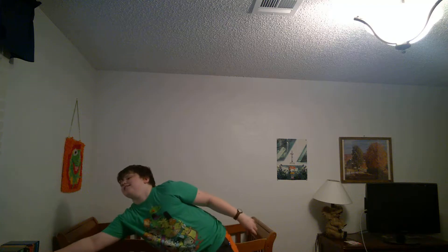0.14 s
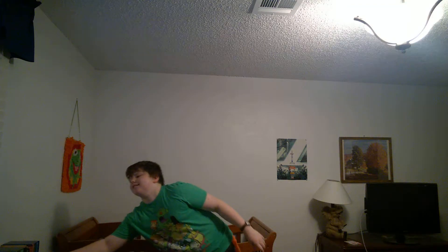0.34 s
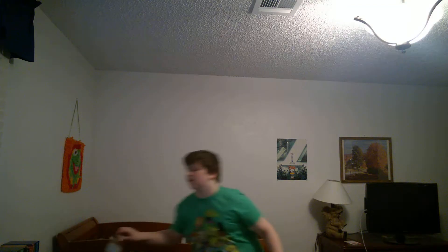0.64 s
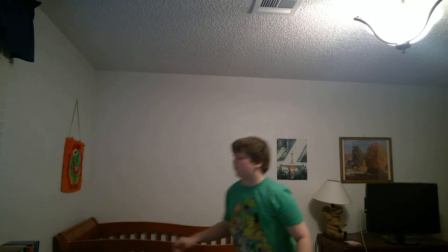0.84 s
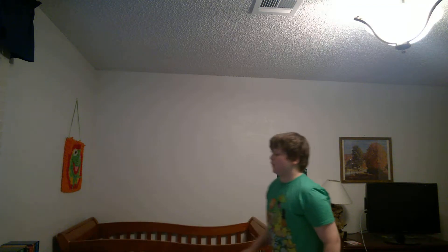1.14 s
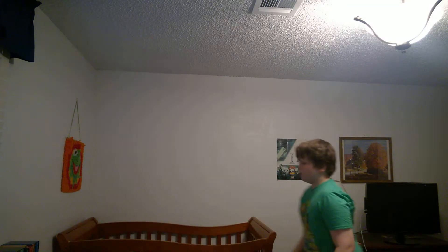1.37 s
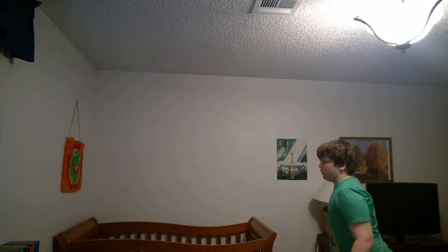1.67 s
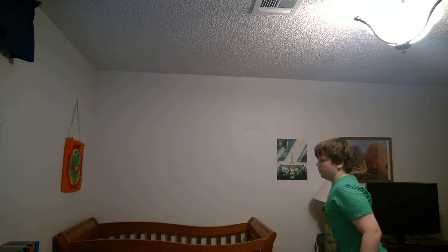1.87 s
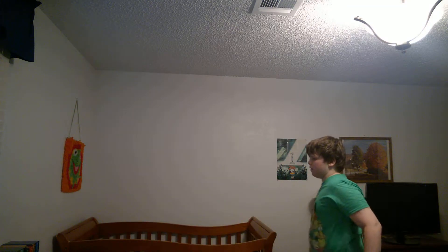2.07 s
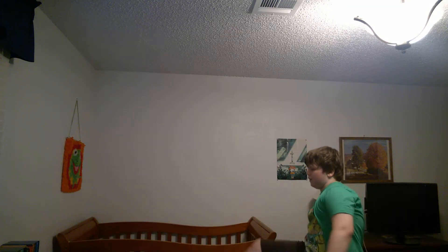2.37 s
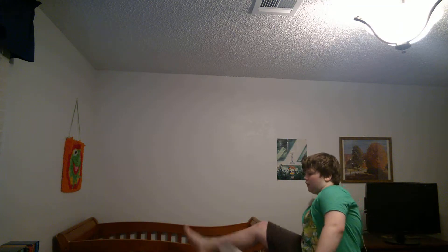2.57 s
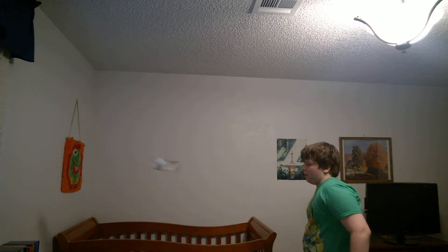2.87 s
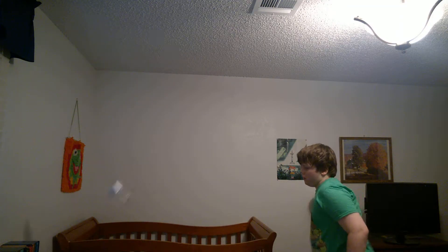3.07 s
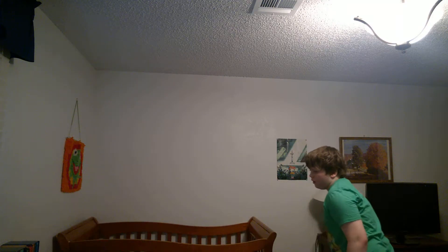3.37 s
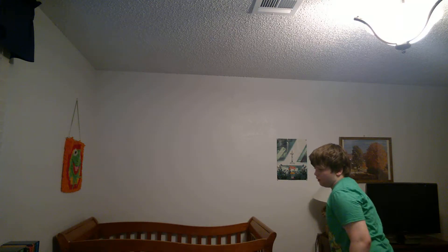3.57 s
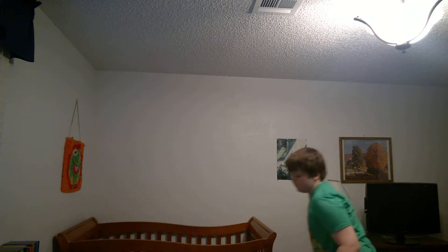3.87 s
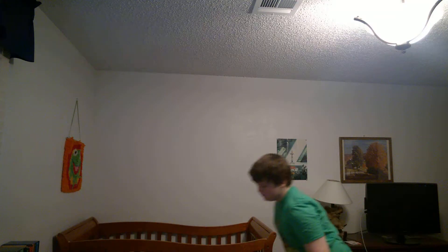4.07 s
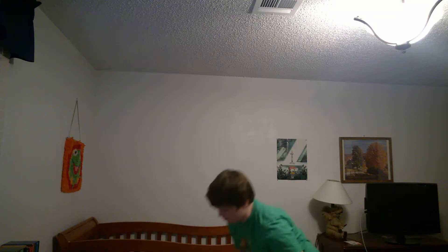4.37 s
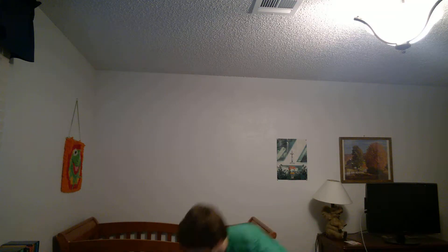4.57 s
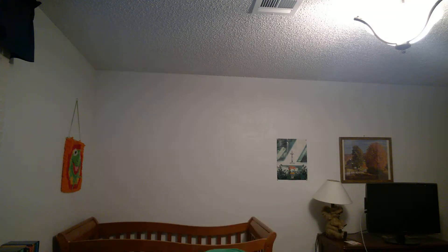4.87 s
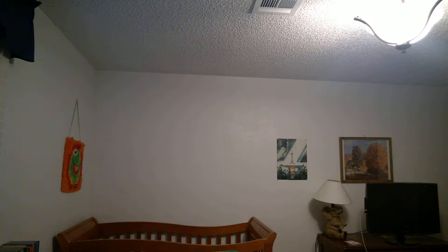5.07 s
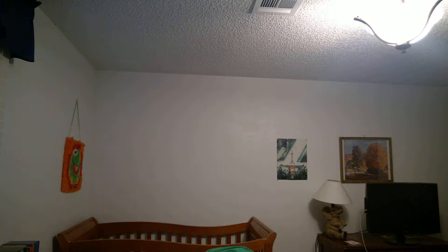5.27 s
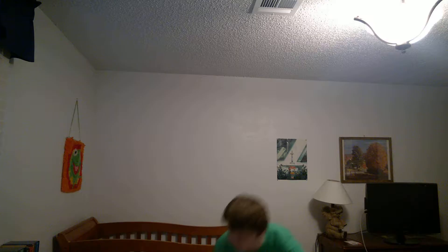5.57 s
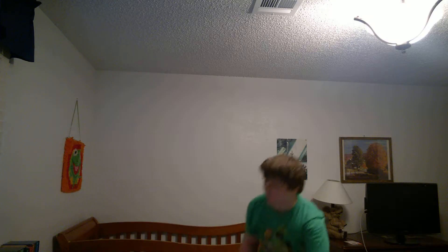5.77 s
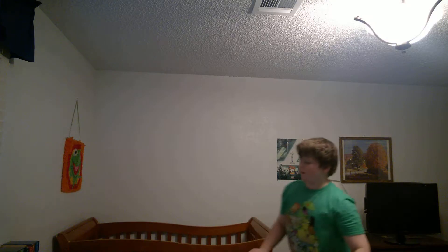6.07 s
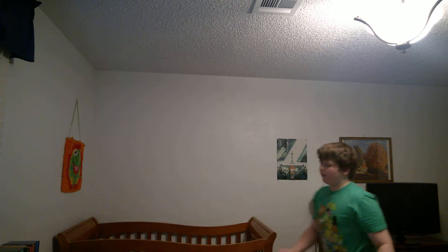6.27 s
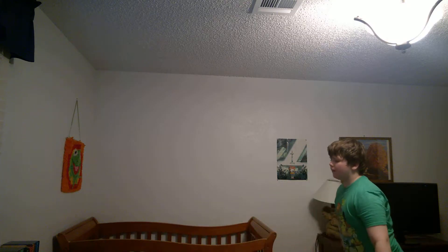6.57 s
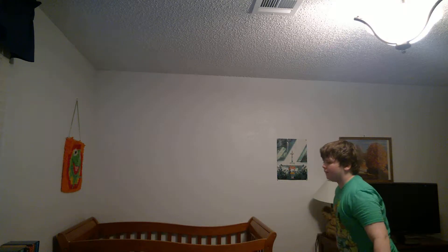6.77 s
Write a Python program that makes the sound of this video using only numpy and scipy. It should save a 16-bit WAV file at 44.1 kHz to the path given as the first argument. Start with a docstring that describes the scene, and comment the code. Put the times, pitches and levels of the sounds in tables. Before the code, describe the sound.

Quiet hollow bottle taps and lapping water come first, followed by low barefoot thuds and cloth swishes over faint rumble and hiss. A light kick sends the bottle into a loud crackling impact, then a second, louder, ringing slam and smaller bounce. A short stick-slip skid, scuffs, more plastic knocks and sloshing follow, ending with a deep step. Stereo microphones sit in a small reflective room.

```python
"""Small bedroom with a hard floor, heard by two closely spaced microphones mostly by way of the walls.
A partly filled plastic bottle is handled and kicked across; it crashes, drops and bounces: each blow
is a hollow knock, a crackle of grains and a set of decaying modes. Lapping water, cloth, scuffs and a
skid are shaped noise or pulses; bare feet on the boards are low decaying swings with soft pushes.
Thin bands squeak and whirr as they glide, short chirps hold one pitch each, over a rumble and hiss."""
import sys
import numpy as np
from scipy import signal
from scipy.fft import rfft, irfft, next_fast_len
from scipy.io import wavfile

SR = 44100
rng = np.random.default_rng(int(sys.argv[2]) if len(sys.argv) > 2 else 0)


def materialize(psi):
    """Save the field psi as 16-bit PCM at rate SR to the path in sys.argv[1].

    A 1-D psi becomes a single channel; in a 2-D psi each row is a channel.
    """
    bounded = np.clip(np.atleast_2d(psi).T, -1, 1)
    quanta = np.round(bounded * 32767).astype(np.int16)
    wavfile.write(sys.argv[1], SR, quanta)


N = 306086
TIME = np.arange(N) / SR
CUTOFF_HZ = 16100  # upper limit of the crackle edges and of the final output


def from_db(db):
    """Decibels to amplitude gain."""
    return 10 ** (np.asarray(db) / 20)


def unit_energy(x):
    """Scale so that the squares sum to one."""
    return x / np.sqrt(np.sum(x ** 2) + 1e-20)


def unit_rms(x):
    """Scale to rms one."""
    return x / np.sqrt(np.mean(x ** 2) + 1e-20)


def at_hz(points, hz):
    """Read a table of (f/Hz, value) on a log-frequency axis."""
    f, value = np.transpose(points)
    return np.interp(np.log(np.maximum(hz, 1)), np.log(f), value)


def add(track, s, sound):
    """Mix a sound into a track at time s."""
    start = max(round(s * SR), 0)
    track[start:start + len(sound)] += sound[:N - start]


def panned(db):
    """Left and right gains for a left-minus-right level difference."""
    return from_db(db / 2 * np.array([[1], [-1]]))


def filtered(x, order, hz, kind="low"):
    """Causal Butterworth filter, low-pass unless told otherwise."""
    return signal.sosfilt(signal.butter(order, hz, kind, fs=SR, output="sos"), x)


def colour(x, spectrum, size=8192):
    """Causal (minimum-phase) filter of unit energy with the given spectrum."""
    log_gain = np.log(from_db(at_hz(spectrum, np.fft.rfftfreq(size, 1 / SR))))
    cepstrum = irfft(log_gain)
    # folding the cepstrum forward in time makes the phase minimal
    cepstrum[1:size // 2] *= 2
    cepstrum[size // 2 + 1:] = 0
    impulse = irfft(np.exp(rfft(cepstrum)))
    return signal.fftconvolve(x, unit_energy(impulse))[:len(x)]


def grains(count, spread_db):
    """Dense tiny clicks of uneven size, rms one."""
    sizes = from_db(spread_db * rng.standard_normal(count))
    return unit_rms(rng.standard_normal(count) * sizes)


def stroke(swell, fade):
    """Pressure that builds over swell s and lets go with time constant fade s, in a half-second window."""
    t = TIME[:SR // 2]
    return np.minimum(t / swell, 1) * np.exp(-np.maximum(t - swell, 0) / fade)


def surge(s, level_db, fall, rise_share):
    """A movement swells to its crest at time s and dies away; the rise scales with the fall."""
    t = TIME - s
    rising = (t / (rise_share * fall)) ** 2
    return from_db(level_db) * np.exp(-np.minimum(np.where(t < 0, rising, t / fall), 20))


def linger(power, seconds):
    """Power leaks away with the given time constant."""
    keep = np.exp(-1 / (seconds * SR))
    return signal.lfilter([1 - keep], [1, -keep], power + 1e-18)


def moving_resonance(drive, hz, width_hz):
    """Random drive ringing in a band whose centre follows the curve hz, near rms one."""
    swell = filtered(drive, 2, width_hz / 2)
    return np.sqrt(2) * unit_rms(swell) * np.sin(2 * np.pi * np.cumsum(hz) / SR)


def glide(rows, width_hz):
    """A thin, unsteady band that follows rows of (t/s, f/Hz, level/dB)."""
    s, hz, level_db = np.transpose(rows)
    level = from_db(np.interp(TIME, s, level_db, left=-120, right=-120))
    return level * moving_resonance(rng.standard_normal(N), np.interp(TIME, s, hz), width_hz)


# How alike diffuse sound is at the two microphones: f/Hz, left-right correlation
MICROPHONE_LIKENESS = [(60, 0.94), (130, 0.68), (290, .82), (640, 0.61), (1400, -0.065), (3100, 0.18),
                       (7000, -0.12), (15000, 0.93)]


def stereo_bands():
    """Yield (low Hz, high Hz, partly correlated stereo noise near rms one) for each third of an octave."""
    edges, count = np.geomspace(18, 18000, 31), next_fast_len(N)
    hz = np.fft.rfftfreq(count, 1 / SR)
    white = rfft(rng.standard_normal((2, count)).astype(np.float32))
    for low, high in zip(edges, edges[1:]):
        in_band = (hz >= low) & (hz < high)
        mid, side = map(unit_rms, irfft(white * in_band, count)[:, :N])
        alike = at_hz(MICROPHONE_LIKENESS, np.sqrt(low * high))
        shared = np.sqrt((1 + alike) / 2) * mid
        opposed = np.sqrt((1 - alike) / 2) * side * [[1], [-1]]
        yield low, high, shared + opposed


# Shape of the steady background, its overall level set apart: f/Hz, relative density/dB per Hz
HUSH_SPECTRUM = [(20, -4.5), (60, -8), (100, -9.5), (157, -22.5), (260, -17.5), (370, -28.5), (460, -22),
                 (620, -30.5), (1000, -37.5), (1700, -36.5), (2500, -43.5), (6000, -44.5), (10000, -51.5),
                 (15500, -59)]


def hush(rms_db=-52):
    """Steady rumble of the house and a faint hiss, as summed noise bands."""
    total = 0
    for low, high, noise in stereo_bands():
        density = from_db(at_hz(HUSH_SPECTRUM, np.sqrt(low * high)))
        total = total + density * np.sqrt(high - low) * noise
    return from_db(rms_db) * unit_rms(total)


# Late die-away of the bedroom: f/Hz, t60/s
ROOM_T60 = [(60, 1.1), (250, 0.28), (1000, 0.5162), (4000, 0.52), (8000, 0.41), (16000, 0.38)]
# Lean of the diffuse field: f/Hz, left minus right/dB
ROOM_BALANCE = [(100, 1), (600, 1.5), (1200, 4), (2400, 4), (4400, -2.5), (8000, -3), (15000, -6)]


def echoes(x, early_share=0.8, early_t60=0.23, build_s=0.00054, shadow_hz=3500):
    """The diffuse field: in each band the sound's power builds up between the walls and dies away."""
    out = 0
    for low, high, noise in stereo_bands():
        hz = np.sqrt(low * high)
        power = filtered(x, 2, [low, high], "band") ** 2
        # furniture shades the treble, which arrives later by way of the ceiling
        power = linger(power, build_s * (1 + hz / shadow_hz))
        # power falls 60 dB, a factor of a million, in one t60
        early = linger(power, early_t60 / np.log(10 ** 6))
        late = linger(power, at_hz(ROOM_T60, hz) / np.log(10 ** 6))
        envelope = np.sqrt(early_share * early + (1 - early_share) * late)
        out = out + panned(at_hz(ROOM_BALANCE, hz)) * noise * envelope
    return out


# How plainly the sources face the microphones: t/s, direct path level/dB
FACING = [(0, -8), (.5, -14), (.7, -2.5), (2.5, -10.5), (2.63, -1), (2.9, -4.5), (3.3, -11), (3.92, -9.5),
          (4.2, -10), (4.4, -27), (5.02, -11), (5.4, -25), (6.5, -13)]
# First reflections off floor, wall and ceiling: delay/s, level against the facing curve/dB
REFLECTIONS = [(.0046, -4.5), (.0118, -7.5), (0.0203, -5.5)]


def bedroom(x, gap_samples=4):
    """A weak direct path, a few first reflections and the diffuse field."""
    direct = x * from_db(np.interp(TIME, *np.transpose(FACING)))
    out = echoes(x)
    paths = [(0.00026, 0.019)] + REFLECTIONS  # the direct path comes first
    for k, (delay, level_db) in enumerate(paths):
        # paths arrive from alternate sides, a few samples apart at the two microphones
        arrival = from_db(level_db) * direct
        add(out[k % 2], delay, arrival)
        add(out[1 - k % 2], delay + gap_samples / SR, arrival)
    return out


# Each jolt sets the water lapping: crest t/s, relative level/dB, dying-away/s, air-pocket note f/Hz
SLOSHES = [(0.069, -52.5, 0.039, 850), (0.117, -47, 0.015, 771), (0.262, -47.5, 0.056, 1000),
           (0.48, -49.5, 0.18, 775), (0.639, -47, 0.018, 981), (1.291, -66, 0.14, 1400),
           (1.635, -47, 0.042, 1310), (1.745, -61, 0.061, 830), (1.99, -66, .04, 591.6),
           (2.12, -52, .025, 522), (2.202, -49.5, 0.034, 1500), (2.57, -63, .03, 1407),
           (2.925, -45.5, 0.031, 1500), (3.095, -46.5, 0.041, 450), (4.975, -49, 0.057, 1188),
           (5.1, -49.5, 0.048, 750), (5.255, -45, .04, 732), (5.35, -54, .04, 1500),
           (5.419, -46.5, .025, 740), (6.295, -46.5, 0.077, 1063), (6.42, -51.5, 0.071, 925),
           (6.505, -55, 0.026, 990)]
# Each move of an arm or leg brushes cloth: crest t/s, relative level/dB, dying-away/s
SWISHES = [(0.113, -57.5, .03), (0.575, -55.5, .05), (1.127, -63.5, .08), (1.4, -58, .05),
           (1.6, -55, 0.078), (2.185, -59, .015), (2.77, -62.5, .05), (2.905, -53.5, .04),
           (4.847, -66, .025), (5.298, -58.5, .1), (6.42, -58.5, .05)]
# Colour of the water: f/Hz, relative density/dB per Hz
SLOSH_SPECTRUM = [(150, -21), (400, 0), (750, -12.5), (1500, -0.5), (2100, -5), (2900, -21), (6000, -23),
                  (16000, -60.5)]
# Colour of the cloth: f/Hz, relative density/dB per Hz
CLOTH_SPECTRUM = [(500, -6), (2500, 4), (4000, 3.5), (5500, 3.5), (7500, -0.5), (10000, 0.5), (16000, -7)]
# rise time constants as a share of the dying-away time
SLOSH_RISE_SHARE, SWISH_RISE_SHARE = 0.88, 0.91


def handling(slosh_db=-3.5, note_db=-3, note_width_hz=450, cloth_db=-1, lump_db=3, lumps_per_s=140):
    """Water laps in small lumps, ringing the bottle's shifting air pocket, while sleeves brush and hiss."""
    slosh = sum(surge(s, level_db, fall, SLOSH_RISE_SHARE) for s, level_db, fall, _ in SLOSHES)
    cloth = sum(surge(s, level_db, fall, SWISH_RISE_SHARE) for s, level_db, fall in SWISHES)
    s, _, _, note_hz = np.transpose(SLOSHES)
    wander = np.interp(TIME * lumps_per_s, np.arange(N), rng.standard_normal(N))
    lumps = unit_rms(from_db(lump_db * wander))
    water = colour(grains(N, spread_db=5.5) * lumps * slosh, SLOSH_SPECTRUM)
    pocket_drive = grains(N, spread_db=6.5) * lumps
    pocket = slosh * moving_resonance(pocket_drive, np.interp(TIME, s, note_hz), note_width_hz)
    sleeves = colour(grains(N, spread_db=3) * lumps * cloth, CLOTH_SPECTRUM)
    return from_db(slosh_db) * water + from_db(note_db) * pocket + from_db(cloth_db) * sleeves


# Thin chirps of skin catching on a smooth surface: crest t/s, f/Hz, level/dB, dying-away/s
CHIRPS = [(0.847, 10100, -47.5, .012), (1.43, 8900, -51.5, 0.0086), (2.359, 3300, -59, 0.012),
          (2.658, 3950, -56, 0.069), (5.505, 9250, -66, 0.021)]


def chirps(width_hz=230):
    """Skin catches on a smooth surface: each chirp is a narrow, unsteady band at one pitch that flares and dies."""
    s, hz, _, _ = np.transpose(CHIRPS)
    nearest = np.searchsorted((s[1:] + s[:-1]) / 2, TIME)
    level = sum(surge(s, level_db, fall, SWISH_RISE_SHARE) for s, _, level_db, fall in CHIRPS)
    return level * moving_resonance(rng.standard_normal(N), hz[nearest], width_hz)


# A hand squeaks faintly on the plastic: t/s, f/Hz, level/dB
SQUEAK = [(.27, 5050, -76), (.32, 5080, -70), (.45, 4960, -69), (.62, 5300, -70)]


def squeak():
    """A hand rubs the plastic: a narrow band of noise glides in pitch and level."""
    return glide(SQUEAK, width_hz=240)


# The flying bottle whirrs: t/s, f/Hz, relative level/dB
WHIRR = [(2.86, 1900, -56), (2.895, 1350, -49.5), (2.925, 1451, -43.5), (2.955, 1640, -50),
         (2.99, 1553, -73)]


def whirr(trim_db=-2):
    """The bottle in flight: a wider gliding band of noise swells and falls."""
    return from_db(trim_db) * glide(WHIRR, width_hz=460)


# Weight landing on the boards: t/s, relative level/dB, floor note f/Hz, rise/s, t60/s
THUMPS = [(0.664, -19.5, 46.5, 0.021, 0.27), (.715, -23.5, 29.8, 0.0066, 0.22),
          (1.366, -12.5, 32.45, 0.018, 0.25), (1.433, -31, 64, 0.0063, 0.22),
          (1.539, -27, 43.6, 0.0124, 0.19), (3.063, -33.5, 48.7, 0.011, 0.34),
          (3.195, -21, 62.4, 0.058, 0.52), (3.298, -11, 66.2, 0.0042, 0.24), (3.93, -8, 48.7, 0.0072, 0.35),
          (3.924, -12.5, 91.7, 0.0027, 0.28), (4.186, -30.5, 185.9, 0.0045, 0.16),
          (4.648, -11.5, 59.9, 0.0224, 0.27), (4.655, -11.5, 31.8, 0.013, 0.18),
          (4.771, -21, 49.5, .012, 0.2), (6.196, -5.5, 43.2, 0.018, 0.22),
          (6.27, -25.5, 54.24, 0.0089, 0.57)]


def boards(overtone=2.1, overtone_db=-24):
    """The floor swings on its joists under each load, with a weaker second mode."""
    out, t = np.zeros(N), TIME[:SR]
    for s, level_db, hz, rise, t60 in THUMPS:
        swing = np.sin(2 * np.pi * hz * t)
        swing = swing + from_db(overtone_db) * np.sin(2 * np.pi * overtone * hz * t)
        add(out, s, from_db(level_db - 60 * t / t60) * (1 - np.exp(-t / rise)) * swing)
    return out


def heels(heel_db=-9, heel_hz=210):
    """Every load on the boards also lands with a soft, dull push: a band-passed impulse."""
    pushes = np.zeros(N)
    impulse = TIME[:SR // 2] == 0
    push = unit_energy(filtered(impulse, 2, [heel_hz / 2, heel_hz * 2], "band"))
    for s, level_db, _, rise, _ in THUMPS:
        add(pushes, s + rise / 2, from_db(level_db + heel_db) * push)
    return pushes


# Soles brushing the floor: t/s, swell/s, fade/s, energy level/dB, treble against the dull part/dB
SCUFFS = [(.658, 0.0095, 0.03, -5, -19), (.839, 0.0079, 0.003, -13.5, 2.5), (1.424, 0.0023, 0.003, -28, 20),
          (2.174, 0.0038, 0.0046, -29.5, 12), (2.35, 0.0066, 0.0082, -31, -2),
          (3.044, 0.0052, 0.0044, -24, 8.5), (3.062, 0.0066, 0.01, -19, -30),
          (4.338, 0.0023, 0.016, -8.5, -3), (4.344, 0.031, 0.024, 1.5, -6.5),
          (4.769, 0.0021, 0.015, -10.5, -25), (5.295, 0.019, 0.054, -16.5, -22.5),
          (5.387, 0.0036, 0.0089, -15.5, -22), (5.452, .003, 0.017, -11.5, 6),
          (5.498, 0.012, 0.0092, -13, 16), (6.58, 0.0025, 0.0059, -34, 12)]
# Colour of skin on boards: f/Hz, relative density/dB per Hz
SCUFF_SPECTRUM = [(100, -8), (400, -3.5), (800, -10.5), (1200, -2), (2200, -9), (3500, -8), (5500, -5),
                  (8000, -11), (11000, -12), (16000, -24.5)]


def scuffs(spread_db=5, edge_hz=3200):
    """Skin rubs over the floor in fine grains; each touch has its own share of treble."""
    out = np.zeros(N)
    for s, swell, fade, level_db, bright_db in SCUFFS:
        pressure = stroke(swell, fade)
        rub = colour(grains(len(pressure), spread_db) * pressure, SCUFF_SPECTRUM)
        dull = filtered(rub, 1, edge_hz)
        add(out, s, from_db(level_db) * unit_energy(dull + from_db(bright_db) * (rub - dull)))
    return out


# The skidding foot, one row: t/s, swell/s, fade/s, energy level/dB, slips per second
SKID = (4.34, 0.04, 0.046, 6.5, 119)
# Boards resonating under the skid: f/Hz, width/Hz, relative level/dB
SKID_BODY = [(108, 11, -1.5), (355, 19, 7.5), (472, 17, 5.5), (623, 11, -3)]


def skid(jitter=.09, count=40):
    """A sole sticks and slips, and every slip knocks the boards' resonances."""
    s, swell, fade, level_db, per_s = SKID
    pressure = stroke(swell, fade)
    slips, out = np.zeros((2, N))
    intervals = np.abs(1 + jitter * rng.standard_normal(count)) / per_s
    slips[(np.cumsum(intervals) * SR).astype(int)] = 1
    drive = slips[:len(pressure)] * pressure
    groan = 0
    for hz, width, db in SKID_BODY:
        resonance = signal.lfilter(*signal.iirpeak(hz, hz / width, fs=SR), drive)
        groan = groan + from_db(db) * unit_energy(resonance)
    add(out, s, from_db(level_db) * unit_energy(groan))
    return out


# Blows on the bottle: t/s, knock energy level/dB, hollow note f/Hz, crackle energy level/dB,
# crackle edge f/Hz (before the upper limit), relative ring level/dB
BLOWS = [(0.106, -18, 910, -27, 9000, -51), (0.240, -11, 840, -16.5, 4440, -53),
         (0.272, -36, 1100, -18, 4500, -55), (0.316, -15, 750, -21, 4000, -55.5),
         (0.377, -13.5, 686, -26, 4000, -59), (0.447, -17, 775, -40, 4000, -54),
         (2.612, -17.5, 448, -18, 4500, -64), (2.6324, -15, 367, -9.5, 4640, -58),
         (3.293, -2.5, 200, 0, 13780, -54), (3.296, 6, 200, 10.5, 13550, -49),
         (3.306, 12.5, 336, 11, 12700, -35), (3.338, -3.5, 400, 4.5, 9600, -38),
         (3.449, -8, 800, -23, 3950, -43.5), (3.605, -21, 1000, -23, 10000, -63),
         (3.631, -22, 434.4, -20.5, 8000, -67), (3.9194, 14.5, 520, 12.5, 14020, -33),
         (3.9234, 16.5, 543, 14, 14000, -15.5), (3.949, 4.5, 242.4, -9.5, 9150, -33.5),
         (4.184, 4.5, 770, -8.5, 8500, -38), (4.645, -7, 208, -14.5, 12950, -49),
         (4.906, -19, 900, -24, 4990, -61), (5.016, -3.5, 812, -10, 10130, -61),
         (5.054, -4.5, 730, -24, 4980, -60), (5.206, -9, 826, -32, 5000, -51.5),
         (6.284, -28, 1103, -22.5, 8980, -57)]
# What bottle and room ring with: f/Hz, relative level/dB, t60/s
RINGS = [(200, -6, 0.19), (234, -8, 0.13), (306, -0.5, 0.047), (348.3, -1, 0.4), (409.5, -11, 0.69),
         (487, -8, .26), (522.8, 5.5, 0.18), (570, -12.5, 0.31), (630, -13.5, .26), (722, -1.5, 0.26),
         (800, -7, 0.39), (912, -12.5, 0.18), (1047, -14, .25), (1220, -10.5, .26), (1344, -16, 0.21),
         (1541, -16, .26), (1680, -17.5, 0.24), (2310, -20.5, 0.19), (3030, -21, 0.26), (3440, -21, .26)]
# Colour of the knock: f/Hz, relative density/dB per Hz
KNOCK_SPECTRUM = [(60, -16.5), (110, 2), (160, 1.5), (210, -0.5), (450, 1.5), (800, -3), (1300, -2.5),
                  (2000, -14), (4000, -31.5), (16000, -49.5)]
# Colour of the buckling plastic: f/Hz, relative density/dB per Hz
CRACKLE_SPECTRUM = [(200, -24), (800, 2.5), (1600, 5), (3000, -1), (5000, 0.5), (7000, -6.5), (11000, -8.5),
                    (16000, -17.5)]
# buckling time constant at 0 dB of crackle, and dB of length per dB of crackle: harder blows last longer
BUCKLE_S, BUCKLE_GROWTH = 0.009, 0.16


def bottle(spread_db=7, ring_scatter_db=1.35, hollow_q=1.2, broad_db=-16, hardening=0.94):
    """Each blow is a hollow knock, a burst of buckling plastic and a ringing; returns (clatter, ringing)."""
    clatter, ringing = np.zeros((2, N))
    t = TIME[:SR // 2]
    hz, mode_db, t60 = np.transpose(RINGS)[:, :, None]
    modes = from_db(mode_db - 60 * t / t60) * np.sin(2 * np.pi * hz * t)
    push = colour(1. * (t == 0), KNOCK_SPECTRUM)
    for s, knock_db, hollow_hz, crackle_db, edge_hz, ring_db in BLOWS:
        cavity = signal.iirpeak(hollow_hz, hollow_q, fs=SR)
        hollow = signal.lfilter(*cavity, signal.lfilter(*cavity, push))
        # a light tap gives mostly the hollow note, a hard blow a broad thud
        thud = from_db(broad_db + hardening * max(knock_db, 0)) * push
        add(clatter, s, from_db(knock_db) * unit_energy(hollow + thud))

        length = BUCKLE_S * from_db(BUCKLE_GROWTH * crackle_db)
        buckles = colour(grains(len(t), spread_db) * np.exp(-t / length), CRACKLE_SPECTRUM)
        buckles = filtered(buckles, 2, min(edge_hz, CUTOFF_HZ))
        add(clatter, s, from_db(crackle_db) * unit_energy(buckles))

        # the point of contact sets the strength and sign of each mode, drawn at random
        signs = rng.choice([-1, 1], len(modes))
        shares = signs * from_db(rng.normal(0, ring_scatter_db, len(modes)))
        add(ringing, s, from_db(ring_db) * (shares @ modes))
    return clatter, ringing


def scene(ring_room_db=-14, skid_room_db=-12, boards_pan_db=2.0, thin_room_db=-4):
    """Clatter and rubbing fill the room; ringing, groan, thin notes and floor reach both mics plainly."""
    background = hush()
    thin_notes = squeak() + whirr()
    floor = panned(boards_pan_db) * boards()
    groan = skid()
    clatter, ringing = bottle()
    airborne = handling() + chirps() + heels() + scuffs() + clatter
    # ringing, groan and thin notes also send a weaker share into the room
    spill = from_db(ring_room_db) * ringing + from_db(skid_room_db) * groan
    spill = spill + from_db(thin_room_db) * thin_notes
    return background + bedroom(airborne + spill) + thin_notes + floor + groan + ringing


def record(dry, top=1.0):
    """The loudest peaks are rounded and a steep low-pass cuts the top of the treble."""
    rounded = top * np.tanh(dry / top)
    return signal.sosfilt(signal.ellip(10, .2, 80, CUTOFF_HZ, fs=SR, output="sos"), rounded)


dry = scene()
out = record(dry)
materialize(out)
```